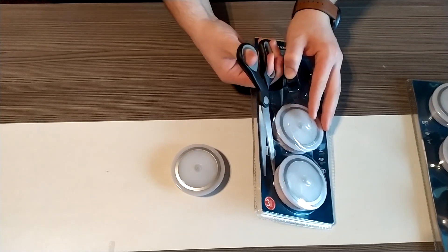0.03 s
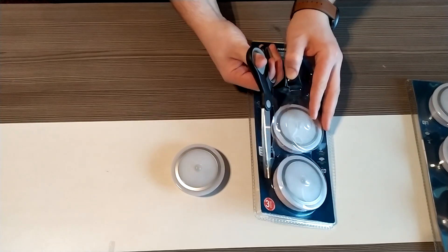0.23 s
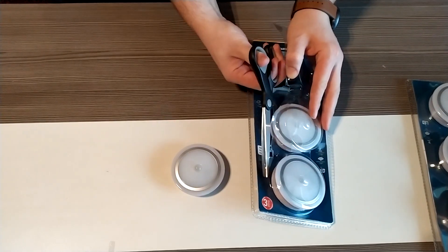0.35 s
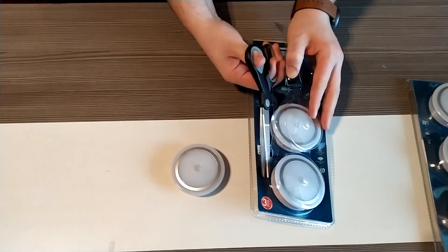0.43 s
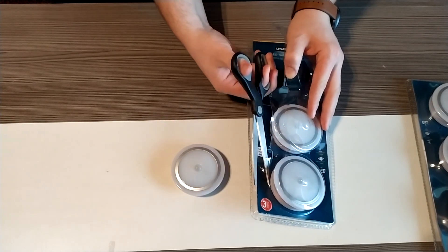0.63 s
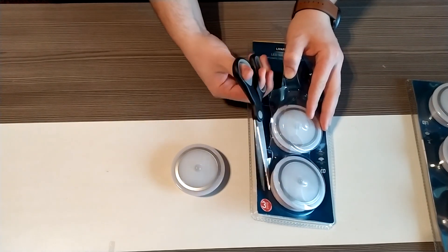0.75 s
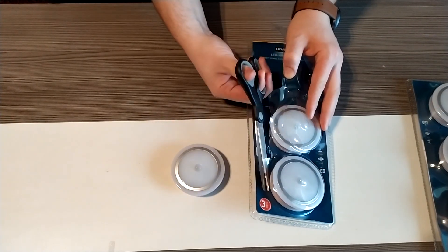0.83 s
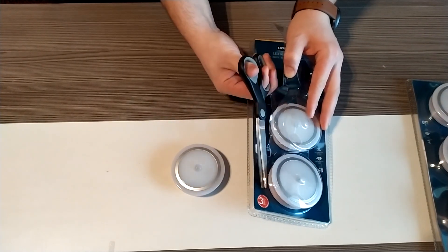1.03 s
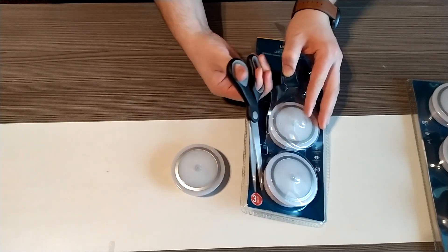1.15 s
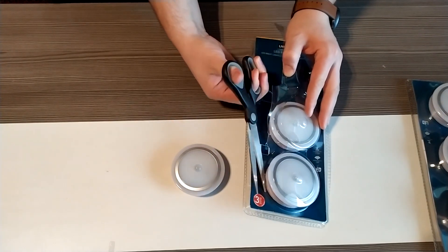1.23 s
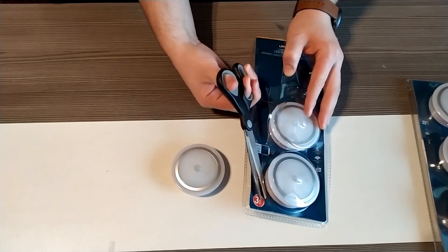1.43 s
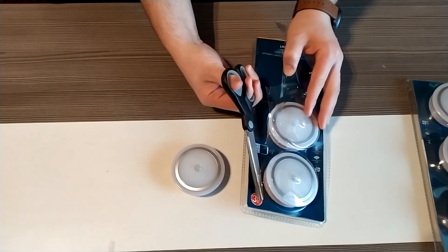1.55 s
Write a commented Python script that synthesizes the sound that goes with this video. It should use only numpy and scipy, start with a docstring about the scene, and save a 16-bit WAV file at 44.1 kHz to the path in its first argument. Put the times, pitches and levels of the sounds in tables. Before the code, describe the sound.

Scissors cut a stiff plastic blister pack on a table: faint rubbing, one loud ringing snap, then much quieter ticks, cracks and a hollow pop, heard close in stereo in a small live room.

```python
"""A faint rubbing of plastic under the hand is heard first; one loud snap follows, then ticks, cracks and pops.
Scissors cut a stiff blister pack on a table, heard close and in stereo in a small live room.
Fracture is modelled as short noise bursts, resonance as damped sinusoids, friction as random tiny slips,
table knocks as low noise bursts; decaying noise serves as the room's impulse response.
Scraping, thuds and soft background noise complete the scene."""
import sys
import numpy as np
from scipy import signal
from scipy.fft import rfft, irfft, next_fast_len
from scipy.io import wavfile

SR = 44100
rng = np.random.default_rng(int(sys.argv[2]) if len(sys.argv) > 2 else 0)


def pcm_store(signal):
    """Save signal as 16-bit PCM."""
    levels = np.round(np.clip(np.atleast_2d(signal), -1, 1) * 32767)
    wavfile.write(sys.argv[1], SR, levels.astype(np.int16).T)


N = 70560  # samples, 1.6 s

# Spectra are relative densities: each noise is scaled to rms 1 before its level is applied.

# Snap, the blades breaking through the rim: spectrum [f/Hz, density/dB]
SNAP_SPECTRUM = [(30, -18.5), (105, -10), (200, -18.5), (330, -13.5), (490, -5), (640, -6), (1250, -4.5),
                 (4500, -4.5), (6800, -6.5), (8000, -5.5), (11500, -7.5), (16000, -18.5)]
SNAP_S, SNAP_DB, SNAP_ROOM_DB = 0.2125, -5, 0.5
SNAP_ATTACK_S, SNAP_HOLD_S, SNAP_T60_S = 0.0018, 0.0028, 0.035
YIELD_LEAD_S, YIELD_DB = 0.0047, -21.5  # the rim starts to give just before it breaks
# Strong modes of the stiff rim [f/Hz, level/dB, T60/s]
RIM_MODES = [(394.5, -31.5, 0.56), (706.6, -20.5, 0.16), (824.6, -23.5, 0.11), (1241, -18, 0.065),
             (1580, -18.5, 0.13), (1709, -23, 0.18)]
# Faint steady-pitched tones in the snap's tail [f/Hz, level/dB re TAIL_TONES_DB]
TAIL_TONES = [(827, 1), (1235, -2), (2233, -10), (2622, -7.5), (3510, -0.5), (5367, -6.5), (7169, -5.5),
              (7683, -9), (9020, -5), (10886, -4.5), (12380, -6)]
TAIL_TONES_DB, TAIL_TONES_T60_S = -31.5, 0.42
TAIL_GRAIN_DB, TAIL_GRAIN_T60_S = -24, 0.5

# Small cracks of the sheet
# [t/s, middle level/dB, upper level/dB, top level/dB, base T60/s, patch f/Hz, patch level/dB]
CRACK_EVENTS = [(0.505, -40.5, -39, -42.5, 0.019, 2170, -32), (0.7003, -51, -57, -66, 0.012, 890, -42),
                (0.7317, -47.5, -43, -40, 0.0096, 4000, -35), (0.806, -45.5, -40.5, -40, 0.0091, 3410, -30),
                (0.8925, -45.5, -30.5, -30.5, 0.02, 1185, -28.5),
                (0.8965, -44, -36, -51, 0.0088, 3510, -30), (0.909, -39, -40, -41, 0.015, 1070, -56),
                (0.9143, -44.5, -27, -36.5, 0.009, 4630, -21),
                (1.0826, -47, -45, -40.5, 0.026, 1810, -43.5), (1.1255, -38, -40, -37, 0.0065, 1070, -31),
                (1.337, -43, -42, -57, 0.018, 1310, -38), (1.389, -45, -35.5, -38.5, 0.023, 10720, -35.5),
                (1.3952, -27, -27, -37, 0.0059, 1890, -22), (1.493, -47, -47.5, -56, .012, 1580, -35),
                (1.5365, -51, -38, -44.5, 0.021, 3070, -37), (1.568, -48.5, -39.5, -45, 0.021, 2780, -37)]
# Middle, upper and top bands of a crack [lower f/Hz, upper f/Hz]
CRACK_BAND_EDGES = [(700, 1970), (2700, 4900), (6000, 12500)]
# Decay time of each band as a multiple of the base T60 [ratio]
CRACK_BAND_LINGER = [3.75, 1.27, 1.66]
CRACK_ATTACK_S, CRACK_HOLD_S, CRACK_ROOM_DB = 0.000413, 0.00053, -8.5
PATCH_LINGER = 1.2  # decay time of the flexing patch over the base T60

# Low notes of the flexing backing card [t/s, f/Hz, level/dB]
CARD_FLEXES = [(.893, 235, -44.5), (1.082, 290, -43), (1.408, 223, -39.5), (1.57, 272, -44)]
FLEX_T60_S = 0.09

# Hollow pops of the buckling blister [t/s, level/dB]
POP_EVENTS = [(1.1655, -47), (1.3962, -26.5)]
# Spectrum of the pop's noise [f/Hz, density/dB]
POP_SPECTRUM = [(30, -42), (250, -13), (450, -20), (620, -16), (1000, 1.5), (1450, 2), (2300, -8.5),
                (3700, -7.5), (7000, -23), (14000, -50)]
# Modes of the blister shell [f/Hz, level/dB re SHELL_DB and the pop, T60/s]
SHELL_MODES = [(620, 4.5, 0.11), (794, 0.5, 0.12), (909, 3, 0.1), (1070, -4.5, 0.31), (1422, 6, 0.1),
               (2430, 0.5, 0.091), (2770, -4, 0.1)]
SHELL_DB = -8  # re the pop
POP_T60_S, POP_ROOM_DB = 0.075, -9

# Level course of the pack rubbing under the hand [t/s, level/dB]
RUB_LEVEL = [(0, -57.5), (0.088, -62.5), (.13, -56.5), (0.501, -49), (.61, -56.5), (.71, -56.5),
             (.83, -52.5), (.88, -62), (1.05, -88), (1.131, -52), (1.174, -47), (1.24, -56.5),
             (1.32, -68.5), (1.377, -53), (1.491, -49), (1.52, -56.5), (1.6, -58)]
# Spectrum of the rubbing [f/Hz, density/dB]
RUB_SPECTRUM = [(100, -22.5), (280, -5.5), (520, -11.5), (850, 0), (1600, -8), (2500, -12), (5000, -17),
                (15000, -25.5)]

# Strokes of a blade along the cut [t/s, hold/s, level/dB]
SCRAPE_STROKES = [(0.642, 0.019, -56), (0.742, 0.043, -53), (1.53, 0.032, -43)]
# Spectrum of the scraping [f/Hz, density/dB]
SCRAPE_SPECTRUM = [(300, -5.5), (2000, 0), (3200, 5.5), (6500, -5.5), (10500, 0), (16000, -15)]

# Thuds of the pack shifting on the table [t/s, level/dB]
THUD_EVENTS = [(0.491, -50.5), (0.795, -53), (0.901, -48), (1.191, -51), (1.403, -49), (1.57, -54.5)]
# Spectrum of a thud [f/Hz, density/dB]
THUD_SPECTRUM = [(20, -36), (60, -16), (100, 3), (160, -14.5), (250, -2), (400, -13), (900, -27)]

# Steady background noise [f/Hz, density/dB]
FLOOR_SPECTRUM = [(15, -45), (25, -11), (92, 9), (344, -8), (439, -1), (796, -3.5), (1040, -3.5),
                  (6740, -16.5), (10400, -16), (16000, -35.5)]
FLOOR_DB = -62.5

# Reverberation time of the room [f/Hz, T60/s]
ROOM_T60 = [(100, 0.44), (300, 0.6), (700, 0.38), (2000, 0.45), (5000, 0.45), (9000, 0.4), (15000, 0.29)]
# Left-right correlation of the reverberation [f/Hz, coefficient]
ROOM_LIKENESS = [(100, 0.99), (280, 0.4), (650, 0.91), (1200, .25), (5000, 0.58)]
# Left-right correlation of the coloured noises [f/Hz, coefficient]
NEAR_LIKENESS = [(100, 0.94), (2000, 0.66), (10000, 0.43)]
# Amount by which the left side is louder [f/Hz, difference/dB]
LEFT_EXCESS = [(200, 0.3), (12000, 1.2)]
LEFT_LEAD_S = 0.000015  # arrival at the left before the right
ROOM_DELAY_S = 0.0045  # the reverberation's fade-in is half complete
MODE_RISE_S = 0.0004  # time constant
CEILING, TOP_HZ = 0.92, 16200  # limiting amplitude, -3 dB band limit


def amp(db):
    """Level definition: decibels to an amplitude ratio."""
    return 10 ** (np.asarray(db) / 20)


def unit(x):
    """Normalisation of mean power: the signal scaled to rms 1."""
    return x / np.sqrt(np.mean(x ** 2) + 1e-20)


def along(points, hz):
    """Interpolation of (f/Hz, value) points on a logarithmic frequency axis."""
    f, value = np.transpose(points)
    return np.interp(np.log(hz + 1), np.log(f + 1), value)


def since(s):
    """Elapsed time in seconds from s, zero before it."""
    return np.maximum(np.arange(N) / SR - s, 0)


def filtered(x, response):
    """Linear filtering: the spectrum multiplied by a frequency response."""
    size = next_fast_len(N + 8192)
    spectrum = rfft(x, size) * response(np.fft.rfftfreq(size, 1 / SR))
    return irfft(spectrum, size)[..., :N]


def spread(pair, likeness):
    """Interaural coherence: two unrelated signals mixed to a given left-right correlation."""
    def mid_side_gains(hz):
        angle = np.arccos(np.clip(along(likeness, hz), -1, 1)) / 2
        return np.array([np.cos(angle), np.sin(angle)])

    mid, side = filtered(pair, mid_side_gains)
    return np.array([mid + side, mid - side])


def coloured(pair, spectrum):
    """Spectral shaping: a near stereo sound of rms 1 filtered by the given spectrum."""
    return unit(filtered(spread(pair, NEAR_LIKENESS), lambda hz: amp(along(spectrum, hz))))


def noise(spectrum):
    """Random excitation: white noise shaped into coloured stereo noise."""
    return coloured(rng.standard_normal((2, N)), spectrum)


def grains(spectrum, rate, scatter_db, hiss):
    """Random impulse process: tiny slips (rate in 1/s) of scattered size, with added hiss."""
    struck = rng.random(N) < rate / SR
    sizes = amp(scatter_db * np.clip(rng.standard_normal(N), -2, 2))
    slips = struck * sizes * rng.choice([-1, 1], (2, N))
    return coloured(unit(slips) + hiss * rng.standard_normal((2, N)), spectrum)


def envelope(s, attack, hold, t60):
    """Transient energy build-up and loss: quadratic rise, hold, exponential decay."""
    rise = np.minimum(since(s) / attack, 1) ** 2
    return rise * amp(-60 * since(s + attack + hold) / t60)


def burst(x, shape):
    """Energy conservation: x under an envelope, carrying exactly the envelope's energy."""
    return unit(x * shape) * np.sqrt(np.mean(shape ** 2))


def in_room(x, room_db):
    """Reverberation: direct sound plus its convolution with noise decaying at a rate set by frequency."""
    diffuse = spread(rng.standard_normal((2, N)), ROOM_LIKENESS)
    hz, t, bins = signal.stft(diffuse, SR, nperseg=256)
    decay = amp(-60 * t / along(ROOM_T60, hz)[:, None])
    tail = signal.istft(bins * decay, SR, nperseg=256)[1][:, :N]
    tail = tail * np.minimum(since(ROOM_DELAY_S / 2) / ROOM_DELAY_S, 1)
    impulse_response = tail / np.linalg.norm(tail[0])
    return x + amp(room_db) * signal.fftconvolve(x, impulse_response, axes=1)[:, :N]


def ring(modes, s):
    """Modal superposition: damped sinusoids from s, alternating in sign, with random phase at each side."""
    t = since(s)
    swing = np.zeros((2, N))
    for k, (hz, db, t60) in enumerate(modes):
        phase = rng.normal(0, 0.48, (2, 1))
        swing += (-1) ** k * amp(db - 60 * t / t60) * np.sin(2 * np.pi * hz * t + phase)
    return swing * (1 - np.exp(-t / MODE_RISE_S))


def snap():
    """Brittle fracture and free vibration: the rim gives, tears and rings, with faint tones in the tail."""
    tear_shape = envelope(SNAP_S, SNAP_ATTACK_S, SNAP_HOLD_S, SNAP_T60_S)
    give_shape = envelope(SNAP_S - YIELD_LEAD_S, YIELD_LEAD_S, 0, SNAP_T60_S)
    tear = amp(SNAP_DB) * burst(noise(SNAP_SPECTRUM), tear_shape)
    give = amp(YIELD_DB) * burst(noise(SNAP_SPECTRUM), give_shape)
    tones = RIM_MODES + [(hz, db + TAIL_TONES_DB, TAIL_TONES_T60_S) for hz, db in TAIL_TONES]
    return in_room(tear + give, SNAP_ROOM_DB) + ring(tones, SNAP_S + SNAP_ATTACK_S)


def tail_grain():
    """Grainy decay: sparse random impulses roughen the snap's fading tail."""
    fade = envelope(SNAP_S, SNAP_ATTACK_S, 0, TAIL_GRAIN_T60_S)
    return amp(TAIL_GRAIN_DB) * fade * grains(SNAP_SPECTRUM, rate=150, scatter_db=0, hiss=0)


def cracks():
    """Local fracture: three-band bursts, the lowest lingering longest, and a brief ring of the patch."""
    out = np.zeros((2, N))
    for k, (lo, hi) in enumerate(CRACK_BAND_EDGES):
        band = noise([(lo / 20, -80), (lo / 2, -24), (lo, 0), (hi, -3), (hi * 2, -40), (hi * 10, -80)])
        for s, *levels, t60, _, _ in CRACK_EVENTS:
            shape = envelope(s, CRACK_ATTACK_S, CRACK_HOLD_S, t60 * CRACK_BAND_LINGER[k])
            out += amp(levels[k]) * burst(band, shape)
    for s, *_, t60, hz, db in CRACK_EVENTS:
        out += ring([(hz, db, t60 * PATCH_LINGER)], s + CRACK_ATTACK_S)
    return in_room(out, CRACK_ROOM_DB)


def pops():
    """Snap-through buckling: the blister flips in a noise burst and rings its shell modes."""
    flip_noise = noise(POP_SPECTRUM)
    out = np.zeros((2, N))
    for s, db in POP_EVENTS:
        flip = burst(flip_noise, envelope(s, 0.0002, 0.0024, POP_T60_S))
        out += amp(db) * (flip + amp(SHELL_DB) * ring(SHELL_MODES, s))
    return in_room(out, POP_ROOM_DB)


def flexes():
    """Plate bending: the backing card sounds brief low notes as damped single modes."""
    return sum(ring([(hz, db, FLEX_T60_S)], s) for s, hz, db in CARD_FLEXES)


def scrapes():
    """Dry friction: bright, gritty slips of steel along the cut edge, in short strokes."""
    strokes = sum(amp(db) * envelope(s, 0.0038, hold, 0.15) for s, hold, db in SCRAPE_STROKES)
    return in_room(strokes * grains(SCRAPE_SPECTRUM, rate=1300, scatter_db=1, hiss=0.28), room_db=-11)


def thuds():
    """Impact radiation: the table top answers each shift of the pack with a soft low knock."""
    out = np.zeros((2, N))
    for s, db in THUD_EVENTS:
        out += amp(db) * burst(noise(THUD_SPECTRUM), envelope(s, 0.006854, 0.0034, 0.35))
    return out


def rubbing():
    """Stick-slip: dull friction of the pack under the hand, following a varying level."""
    level_db = np.interp(since(0), *np.transpose(RUB_LEVEL))
    return amp(level_db) * grains(RUB_SPECTRUM, rate=740, scatter_db=1.5, hiss=0.75)


def background():
    """Stationary random noise: the steady sound of the quiet room."""
    return amp(FLOOR_DB) * noise(FLOOR_SPECTRUM)


def scene():
    """Superposition: all handling, set slightly to the left by level and arrival time, over the room."""
    near = snap() + tail_grain() + cracks() + pops() + flexes() + scrapes() + thuds() + rubbing()
    sides = np.array([[1], [-1]])  # left, right

    def placement(hz):
        gain = amp(along(LEFT_EXCESS, hz) * sides / 2)
        return gain * np.exp(1j * np.pi * hz * LEFT_LEAD_S * sides)

    return filtered(near, placement) + background()


def record(dry):
    """Saturation and band limiting: peaks are rounded off, then a steep low-pass ends the band."""
    rounded = dry / (1 + np.abs(dry / CEILING) ** 4) ** (1 / 4)
    return filtered(rounded, lambda hz: 1 / np.sqrt(1 + (hz / TOP_HZ) ** 160))


dry = scene()
out = record(dry)
pcm_store(out)
```